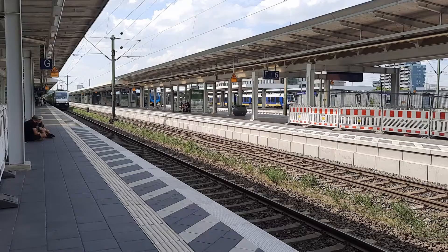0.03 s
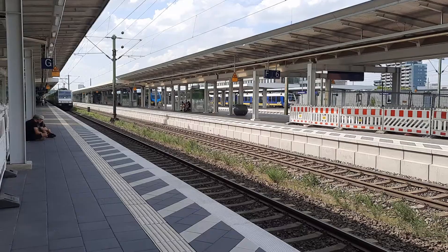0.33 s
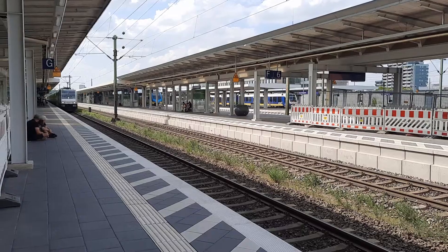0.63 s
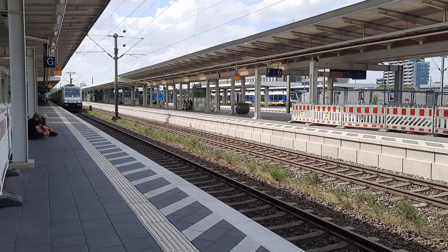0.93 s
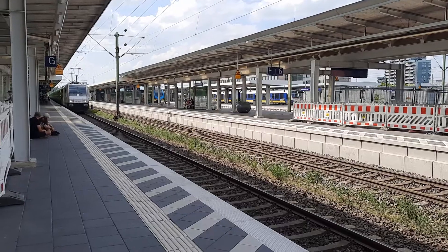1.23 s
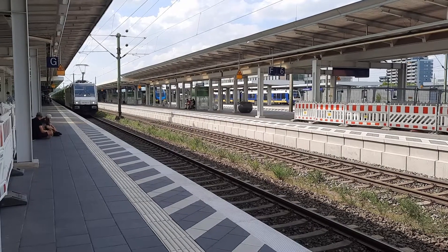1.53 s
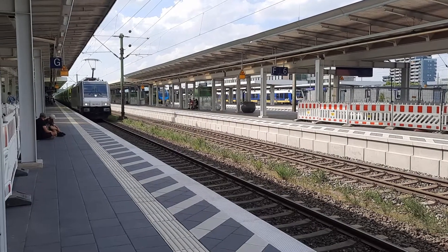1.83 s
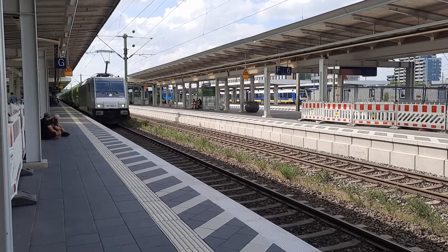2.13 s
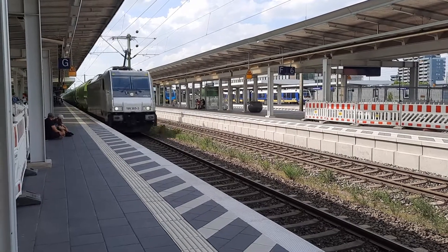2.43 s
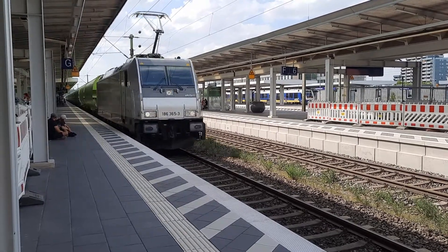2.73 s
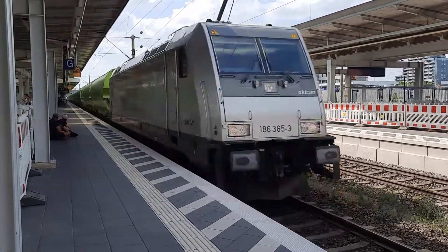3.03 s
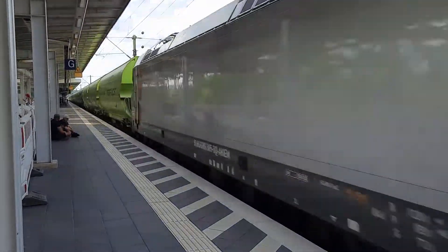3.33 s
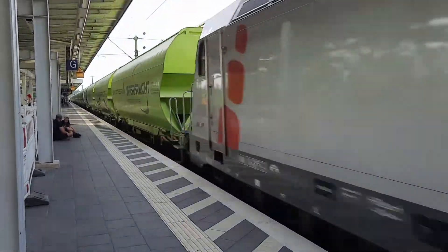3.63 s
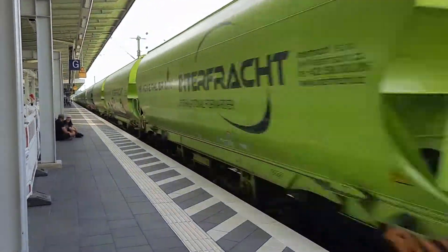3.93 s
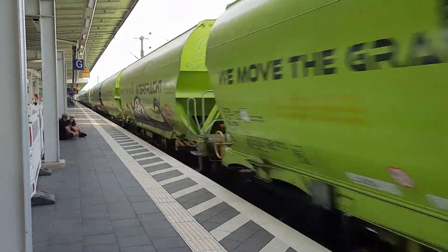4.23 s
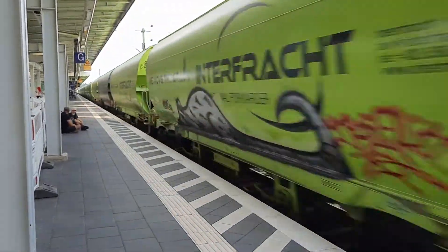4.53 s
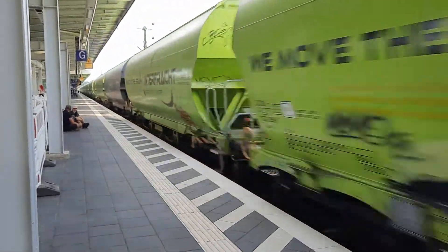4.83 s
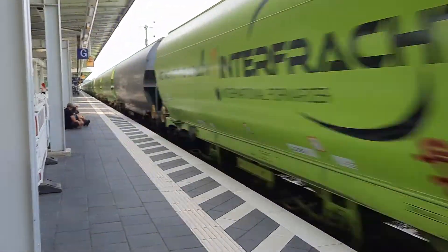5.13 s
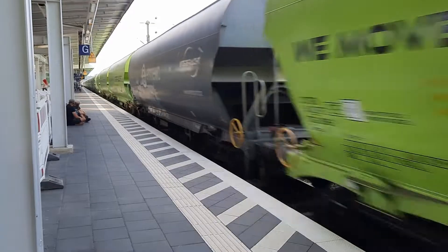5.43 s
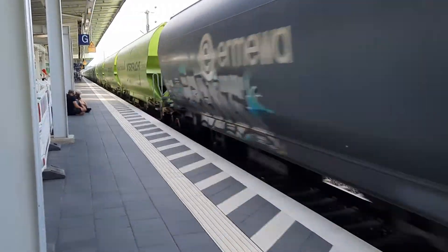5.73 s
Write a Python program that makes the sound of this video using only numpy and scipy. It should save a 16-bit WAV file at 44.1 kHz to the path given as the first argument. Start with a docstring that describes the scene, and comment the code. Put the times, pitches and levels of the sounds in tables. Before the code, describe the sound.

A freight train approaches from the left, announced by thin metallic ringing in the rails, brief squeaks and a swelling rumble. Small air pops hit the right microphone. The electric locomotive then sweeps by close to the platform with a falling whoosh, a low gust of wind and a short whine. Wagon after wagon rolls past, rumbling and hissing, each set of wheels ringing and sliding down in pitch.

```python
"""A freight train passes close to a station platform. First the rails sing and wheels squeak far ahead,
with one dry tick and puffs of air popping in the right microphone. At 3.2 s the electric locomotive
arrives: its nose whooshes, its slipstream buffets both microphones, air hisses, two drives whine.
Then wagon after wagon rumbles by, the ringing wheels dropping in pitch as they pass."""
import sys
import numpy as np
from scipy import signal
from scipy.fft import next_fast_len
from scipy.io import wavfile
from scipy.ndimage import uniform_filter1d

SR = 44100
rng = np.random.default_rng(int(sys.argv[2]) if len(sys.argv) > 2 else 0)


def transcribe(u):
    """Save the signal u as a 16-bit wav file named by the first command-line argument.

    u: samples, shape (n,) or (channels, n), limited to [-1, 1]; the rate is SR.
    q: integer samples, one column per channel.
    """
    v = np.clip(np.atleast_2d(u).T, -1, 1)
    q = np.round(v * 32767).astype(np.int16)
    wavfile.write(sys.argv[1], SR, q)


N = 255780
TIME = np.arange(N) / SR
HZ = np.fft.rfftfreq(1024, 1 / SR)
FRAME_TIME = np.arange(N // 256 + 5) * 256 / SR
TRAIN_M_PER_S, SOUND_M_PER_S = 27, 343


def gain_of(db):
    """Decibels to amplitude."""
    return 10 ** (np.asarray(db) / 20)


def unit_rms(x):
    """Scales to rms 1."""
    return x / np.sqrt(np.mean(x ** 2) + 1e-20)


def curve(rows, t=TIME, column=1):
    """A table column, interpolated in time."""
    rows = np.array(rows)
    return np.interp(t, rows[:, 0], rows[:, column])


def colour(rows, hz=HZ, column=1):
    """A table column, interpolated in log frequency."""
    rows = np.array(rows)
    return np.interp(np.log(hz + 1), np.log(rows[:, 0] + 1), rows[:, column])


def swell(peak_s, length_s):
    """Gaussian rise and fall."""
    return np.exp(-(2 * (TIME - peak_s) / length_s) ** 2)


def random_spectra():
    """Two independent fields of complex noise, frames x bins."""
    shape = (2, len(FRAME_TIME), len(HZ))
    return rng.standard_normal(shape) + 1j * rng.standard_normal(shape)


def waveform(spectra):
    """Short-time spectra to sound."""
    return signal.istft(np.swapaxes(spectra, -1, -2), nperseg=1024, noverlap=768)[1][..., :N]


def patches(frames, bins):
    """Random unevenness in time and frequency, rms 1."""
    field = rng.standard_normal((len(FRAME_TIME), len(HZ)))
    field = uniform_filter1d(field, frames, axis=0)
    return unit_rms(uniform_filter1d(field, bins, axis=1, mode="wrap"))


def resonance(hz, width_hz):
    """A narrow mode shaken at random, independently per channel; hz may glide."""
    offset_hz = np.fft.fftfreq(next_fast_len(N), 1 / SR)
    real, imaginary = rng.standard_normal((2, 2, len(offset_hz)))
    shake = np.fft.ifft((real + 1j * imaginary) / (1 + (1.28 * offset_hz / width_hz) ** 2))[:, :N]
    carrier = np.exp(2j * np.pi * np.cumsum(hz * np.ones(N)) / SR)
    return unit_rms((shake * carrier).real)


def panned(balance_db):
    """Left and right gains of mean power 1."""
    gains = gain_of([balance_db / 2, -balance_db / 2])
    return gains / np.sqrt(np.mean(gains ** 2, axis=0))


# Each row: frequency in Hz, left minus right in dB for the far train, the locomotive, the wagons.
BALANCE_DB = [(100, 5, 2, 0), (500, 6.5, 2.5, 2), (1100, 8.5, 2.5, 4.5), (1840, 16, 5, 5.5),
              (2520, 10, 2, 0.5), (3130, 4.5, -2, -4), (4530, 1.5, 4, -0.5), (6500, -5.5, -3.5, -7.5),
              (10000, 6, 8, 2.5), (13000, 0, 0, -4)]
FAR_COLUMN, LOCOMOTIVE_COLUMN, WAGON_COLUMN = 1, 2, 3


def sides(hz, column=FAR_COLUMN, left_db=0):
    """Stereo gains of a tone from one part of the train."""
    return panned(colour(BALANCE_DB, hz, column) + left_db)[:, None]


# Each row: time in seconds, part heard (0 far train, 1 locomotive, 2 wagons).
PART_HEARD = [(1.3, 0.02), (2.5, 0.26), (3.2, 0.88), (3.75, 1.62), (4.7, 1.75)]


def by_part(spectra):
    """Crossfades far, locomotive and wagon spectra as the train moves on."""
    part = curve(PART_HEARD, FRAME_TIME)[:, None]
    return sum(np.maximum(1 - abs(part - k), 0) * spectrum for k, spectrum in enumerate(spectra))


def pass_by(alongside_s, distance_m, t=TIME):
    """Nearness (1 when alongside) and Doppler factor of a point on the train."""
    along_m = TRAIN_M_PER_S * (t - alongside_s)
    range_m = np.hypot(along_m, distance_m)
    return distance_m / range_m, 1 / (1 + TRAIN_M_PER_S / SOUND_M_PER_S * along_m / range_m)


def train_level(sources, distance_m, far_db, arrival_db, wagons_db, loss_db_per_m):
    """Level in dB: a distant floor, sound carried ahead by the track, and passing sources (s, dB)."""
    arrival_s, handover_s, lossless_m = 3.22, .85, 18.2
    ahead_m = np.maximum(TRAIN_M_PER_S * (arrival_s - FRAME_TIME) - lossless_m, 0)
    wagon_share = np.clip((FRAME_TIME - arrival_s) / handover_s, 0, 1)
    track_db = arrival_db + (wagons_db - arrival_db) * wagon_share - loss_db_per_m * ahead_m
    near_power = sum((gain_of(db) * pass_by(s, distance_m, FRAME_TIME)[0]) ** 2 for s, db in sources)
    return 10 * np.log10(gain_of(far_db) ** 2 + gain_of(track_db) ** 2 + near_power)


# Each row: frequency in Hz, left-right coherence of the diffuse sound.
DIFFUSE_COHERENCE = [(60, 1), (300, 0.89), (550, 0.61), (780, 0.31), (1000, 0.055), (1350, -0.26),
                     (1900, 0.036), (2300, 0.17), (3000, -0.015), (5000, 0)]
# Each row: time in seconds, lead of the left microphone in ms, direct share in the bass (0-1).
DIRECT_PATH = [(.14, .18, 0.5), (2.5, 0.18, 0.2), (3.3, -0.04, 0.1), (3.75, -0.18, 0), (4.2, -0.59, 0),
               (5.8, -0.42, 0)]


def train_noise(shape_db, level_db, band_hz, uneven_db):
    """Coloured noise, mostly diffuse, partly direct; level_db sets the mid signal inside band_hz."""
    a, b = random_spectra()
    direct = curve(DIRECT_PATH, FRAME_TIME, column=2)[:, None] / np.sqrt(1 + (HZ / 2000) ** 2)
    lead_s = curve(DIRECT_PATH, FRAME_TIME)[:, None] / 1000
    diffuse = np.clip(colour(DIFFUSE_COHERENCE), -.99, .99)
    coherence = (1 - direct) * diffuse + direct * np.exp(-2j * np.pi * HZ * lead_s)
    unshared = np.sqrt(np.maximum(1 - abs(coherence) ** 2, 0))
    left, right = panned(by_part([colour(BALANCE_DB, column=k) for k in (1, 2, 3)]))
    pair = np.array([left * a, right * (coherence * a + unshared * b)])
    shape = gain_of(shape_db)
    mid_power = shape ** 2 * (left ** 2 + right ** 2 + 2 * coherence.real * left * right) / 4
    in_band = (HZ > band_hz[0]) & (HZ < band_hz[1])
    band_rms = np.sqrt((mid_power * in_band).mean(1, keepdims=True))
    level = gain_of(level_db[:, None] + uneven_db)
    return waveform(pair * shape * level / band_rms) / waveform(a).std()


def tick(start_s=.8322, level_db=-20.5, decay_s=.0005):
    """One dry tick on the platform: a noise burst with no ring."""
    burst = unit_rms(signal.lfilter([1], [1, -.7], rng.standard_normal((2, N))))
    return gain_of(level_db) * burst * (TIME >= start_s) * np.exp(-abs(TIME - start_s) / decay_s)


# Each row: frequency in Hz, relative density in dB.
AIR_SPECTRUM = [(6000, -40), (9000, -8), (10300, -1.5), (12500, 2.5), (14500, 0), (16000, -3)]


def air():
    """Fine hiss of air that peaks beside the locomotive."""
    level_db = train_level([(3.46, -33)], distance_m=3, far_db=-56, arrival_db=-45.3,
                           wagons_db=-49, loss_db_per_m=.62)
    return train_noise(colour(AIR_SPECTRUM), level_db, (10000, 15500), 1.3 * patches(frames=8, bins=30))


def ringing(hz, waver_hz):
    """A note from far down the track, wavering differently at each microphone."""
    drift = unit_rms(uniform_filter1d(rng.standard_normal((2, N)), size=700))
    phase = 2 * np.pi * np.cumsum(hz + waver_hz * drift, axis=1) / SR
    return np.sqrt(2) * np.sin(phase) * sides(hz)


# Each row: core in Hz, cluster in Hz; lower note first.
RAIL_NOTES_HZ = [(4035, 4065), (6157, 6205)]
# Each row: peak in seconds, length in seconds, relative level in dB of the lower note, of the upper.
NOTE_FLARES = [(0.192, 0.11, -57, -46), (.67, 0.11, -47, -52), (1.283, .24, -62, -46),
               (1.47, 0.12, -46.5, -59), (1.9, 0.23, -46, -45), (2.18, .1, -52, -44),
               (2.36, 0.23, -47, -43.5), (2.55, 0.16, -51, -53)]
# Each row: frequency in Hz, width in Hz, base level in dB.
WEAK_RAIL_MODES = [(2537, 125, -47.5), (3080, 51, -54.5), (4190, 110, -58), (4940, 40, -64),
                   (5300, 40, -73), (5860, 49, -56), (6800, 71, -64), (7300, 91, -69), (7900, 50, -72),
                   (8300, 70, -70), (8900, 25, -66)]
# Each row: time in seconds, gain in dB on the weak modes and the distant hiss.
RAIL_GAIN_DB = [(.3, 4), (.9, 0), (2.4, 4), (3, 0.5), (3.5, -33)]


def rails(base_db=(-53, -49.5), fade_start_s=(2.6, 2.95), fade_db_per_s=22):
    """High rail modes carry far ahead of the train, flare now and then, and fade as it arrives."""
    notes = np.zeros((2, N))
    for k, (core_hz, cluster_hz) in enumerate(RAIL_NOTES_HZ):
        fade_db = -fade_db_per_s * np.maximum(TIME - fade_start_s[k], 0)
        flare_power = sum((gain_of(dbs[k]) * swell(s, length)) ** 2 for s, length, *dbs in NOTE_FLARES)
        level = np.sqrt(gain_of(base_db[k] + fade_db) ** 2 + flare_power)
        # A clear core beats against close modes just above it.
        cluster = resonance(cluster_hz, width_hz=58) * sides(core_hz)
        core = ringing(core_hz, waver_hz=13.94)
        notes += level * (gain_of(1.5) * core + gain_of(2.5) * cluster)
    modes = sum(gain_of(db) * resonance(hz, width) * sides(hz) for hz, width, db in WEAK_RAIL_MODES)
    return notes + gain_of(curve(RAIL_GAIN_DB)) * modes


# Each row: peak in seconds, length in seconds, pitch in Hz, level in dB.
APPROACH_TONES = [(.28, 0.32, 3060, -52), (.33, 0.52, 5120, -48.5), (.3, .45, 5740, -50),
                  (.6, .3, 7200, -51), (1.48, .14, 7255, -54), (2.14, .2, 8400, -48),
                  (2.15, .14, 7760, -48), (2.4, .1, 7826, -40), (2.54, .1, 1720, -35)]


def approach_tones():
    """Brief high wheel squeaks, and one short swell of the distant drive whine at 1720 Hz."""
    return sum(gain_of(db) * swell(peak_s, length_s) * ringing(hz, waver_hz=5.8)
               for peak_s, length_s, hz, db in APPROACH_TONES)


# Each row: start in seconds, relative strength in dB, rise in seconds.
AIR_PUFFS = [(0.5696, 1.5, 0.00018), (2.6333, 4.5, 0.0002), (2.7102, -9, .00022), (2.723, 3.5, 0.0003),
             (2.772, -6, .0003), (2.7946, 1, .00022), (2.866, 7.5, .0007), (2.8784, 5, 0.00054),
             (3.1866, 2.5, .00025), (3.231, 0, .0003), (3.2375, -1, .00025)]


def pops(fall_s=.015, cut_hz=56, left_db=-36, right_db=-.5):
    """A puff is a sudden pressure step; the microphone's bass cut makes it swing back and forth."""
    pressure = np.zeros(N)
    for start_s, db, rise_s in AIR_PUFFS:
        age_s = np.maximum(TIME - start_s, 0)
        pressure += gain_of(db) * (1 - np.exp(-age_s / rise_s)) * np.exp(-age_s / fall_s)
    bass_cut = signal.butter(5, cut_hz, "high", fs=SR, output="sos")
    return signal.sosfilt(bass_cut, pressure) * gain_of([[left_db], [right_db]])


# Each row: frequency in Hz, relative density in dB.
EDDY_SPECTRUM = [(20, -25), (45, -6), (80, -2.5), (200, -4.5), (400, -14), (1000, -27), (4000, -60)]
# Each row: peak in seconds, length in seconds, left level in dB, right level in dB.
SLIPSTREAM_GUSTS = [(3.407, 0.084, -31, -11.5), (3.504, 0.11, -21, -20)]


def slipstream():
    """Low turbulence, different at each microphone, just behind the locomotive's nose."""
    eddies = unit_rms(waveform(random_spectra() * gain_of(colour(EDDY_SPECTRUM))))
    return eddies * sum(gain_of([[left_db], [right_db]]) * swell(peak_s, length_s)
                        for peak_s, length_s, left_db, right_db in SLIPSTREAM_GUSTS)


def whoosh(start_s=3.28, level_db=-21, top_hz=1106, end_hz=135, dive_s=.055):
    """A band of rushing noise dives in pitch as the nose sweeps past."""
    attack_s, hold_s, release_s = .035, .2, .09
    age_s = np.maximum(TIME - start_s, 0)
    hz = end_hz + (top_hz - end_hz) * np.exp(-age_s / dive_s)
    envelope = np.minimum(age_s / attack_s, 1) * np.exp(-np.maximum(age_s - hold_s, 0) / release_s)
    rush = resonance(hz, width_hz=190)[0]
    return rush * gain_of(level_db) * envelope * panned(balance_db=2.2)[:, None]


# Each row: time alongside in seconds, level in dB.
DRIVEN_BOGIES = [(3.53, -32), (3.94, -35)]
# Each row: multiple of the whine pitch, width in Hz, relative level in dB.
DRIVE_LINES = [(.512, 110, 0.5), (1, 75.6, 5), (1.47, 199, -3.5), (2, 150, -4.5)]


def drives(whine_hz=1594, screening_db_per_m=1.3):
    """Gears and motors whine in fuzzy lines that drop in pitch on passing; the wagons then screen them."""
    out = np.zeros((2, N))
    for alongside_s, drive_db in DRIVEN_BOGIES:
        nearness, doppler = pass_by(alongside_s, distance_m=6)
        past_m = TRAIN_M_PER_S * np.maximum(TIME - alongside_s, 0)
        level = gain_of(drive_db - screening_db_per_m * past_m) * nearness ** .89
        for multiple, width_hz, line_db in DRIVE_LINES:
            hz = multiple * whine_hz
            pan = sides(hz, LOCOMOTIVE_COLUMN, left_db=2.8)
            out += gain_of(line_db) * level * pan * resonance(hz * doppler, width_hz)
    return out


# Each row: time alongside in seconds, rumble, roar, hiss and wheel ring in dB, wheel tuning factor.
BOGIE_GROUPS = [(3.381, -22, -28, -35, -51, 1.0), (3.98, -32, -28, -38, -44, 1.07),
                (4.55, -22.5, -37, -38, -34.5, 1.085), (5.13, -23, -37, -37, -36, 1.05),
                (5.66, -28, -46, -34.5, -32, .96)]
# Each row: frequency in Hz before tuning, width in Hz, relative level in dB.
WHEEL_RESONANCES = [(1213, 150, 1), (1817, 89, 1), (1968, 140, -6.5), (5650, 700, -9)]


def wheels():
    """Each group of wheels rings, swelling as it nears and dropping in pitch as it goes by."""
    out = np.zeros((2, N))
    for alongside_s, *_, ring_db, tuning in BOGIE_GROUPS:
        nearness, doppler = pass_by(alongside_s, distance_m=3.5)
        level = gain_of(ring_db) * nearness ** .76
        for hz, width_hz, mode_db in WHEEL_RESONANCES:
            ring = resonance(hz * tuning * doppler, width_hz)
            out += gain_of(mode_db) * level * sides(hz, WAGON_COLUMN) * ring
    return out


# Rolling noise of each part. Each row: frequency in Hz, relative density in dB.
FAR_SPECTRUM = [(25, -2.5), (48, 11), (80, -2.5), (120, -5.5), (170, -2), (300, 0), (430, -12), (560, -14),
                (1000, -14), (2500, -18.5), (3500, -27.5), (5500, -27.5), (8300, -30.5), (9800, -51),
                (12500, -76)]
LOCOMOTIVE_SPECTRUM = [(25, -12), (85, -2.8), (150, -.3), (220, -3), (295, 2), (480, -5.5), (640, -8.5),
                       (850, -9.2), (1150, -13.5), (1700, -15.5), (2360, -17), (4080, -28), (8180, -27.5),
                       (9500, -36), (12400, -66)]
WAGON_SPECTRUM = [(25, -15), (50, -1), (78, 4.2), (135, 1.5), (223, -3.5), (315, 0.5), (436, -6),
                  (530, -15.3), (1010, -22), (1550, -20), (2200, -21.5), (3260, -27), (5640, -25),
                  (8180, -32.5), (11000, -45)]
# Common to all parts. Each row: centre in Hz, width in Hz, gain in dB.
PEAKS_AND_DIPS = [(175, 40, 2), (230, 50, -4), (330, 110, 2), (530, 130, -1.5), (820, 140, 2),
                  (8300, 800, 1.5), (9250, 700, -3)]


def rolling(rumble_top_hz=520, roar_top_hz=3300):
    """Rough wheels on rough rails: rumble from the bodies, roar from the wheels, hiss from the contact."""
    shape_db = by_part([colour(FAR_SPECTRUM), colour(LOCOMOTIVE_SPECTRUM), colour(WAGON_SPECTRUM)])
    shape_db += sum(db * np.exp(-2 * ((HZ - hz) / width) ** 2) for hz, width, db in PEAKS_AND_DIPS)
    above_rumble, above_roar = (1 / (1 + (hz / (HZ + 1)) ** 8) for hz in (rumble_top_hz, roar_top_hz))
    shares = [1 - above_rumble, above_rumble * (1 - above_roar), above_roar]
    low_db, mid_db, high_db = (shape_db + 10 * np.log10(share + 1e-12) for share in shares)
    rumbles, roars, hisses = ([(row[0], row[k]) for row in BOGIE_GROUPS] for k in (1, 2, 3))
    rumble_db = train_level(rumbles, distance_m=4.5, far_db=-40, arrival_db=-26,
                            wagons_db=-20.5, loss_db_per_m=.35)
    roar_db = train_level(roars, distance_m=4, far_db=-46.5, arrival_db=-30,
                          wagons_db=-28.5, loss_db_per_m=.28)
    hiss_db = train_level(hisses, distance_m=3.5, far_db=-49.5 + curve(RAIL_GAIN_DB, FRAME_TIME),
                          arrival_db=-45.5, wagons_db=-38.7, loss_db_per_m=.4)
    judder = patches(frames=5, bins=len(HZ))  # one shake for all bands
    rumble = train_noise(low_db, rumble_db, (150, 500), .19 * judder + patches(frames=10, bins=4))
    roar = train_noise(mid_db, roar_db, (600, 2800), .21 * judder + 1.16 * patches(frames=14, bins=6))
    hiss = train_noise(high_db, hiss_db, (4400, 8500), .38 * judder + 1.24 * patches(frames=16, bins=8))
    return rumble + roar + hiss


def scene(cut_hz=46):
    """The train and its slipstream, thinned in the deepest bass, plus the pops and the tick."""
    train = rolling() + air() + rails() + approach_tones() + drives() + wheels() + whoosh() + slipstream()
    bass_cut = signal.butter(6, cut_hz, "high", fs=SR, output="sos")
    return signal.sosfilt(bass_cut, train) + pops() + tick()


def record(dry):
    """A moment of silence, clipping at full scale, then a steep low-pass."""
    start_s, edge_hz = .13, 15950
    clipped = np.clip(dry * (TIME >= start_s), -1, 1)
    low_pass = signal.firwin(511, edge_hz, window=("kaiser", 9), fs=SR)
    return signal.oaconvolve(clipped, low_pass[None], "same")


dry = scene()
out = record(dry)
transcribe(out)
```